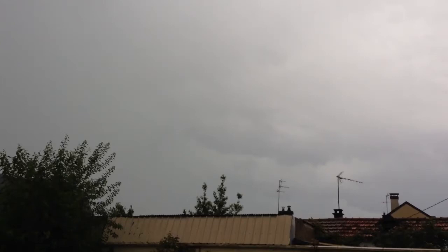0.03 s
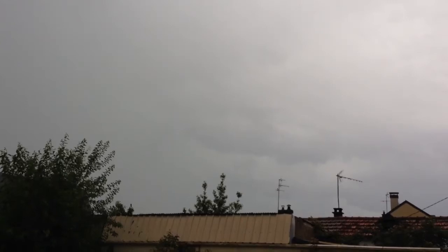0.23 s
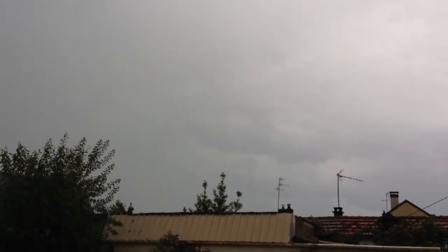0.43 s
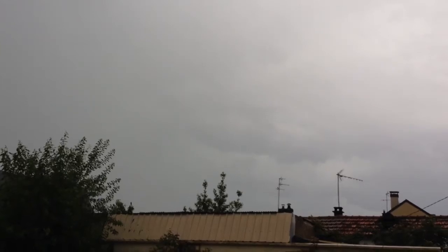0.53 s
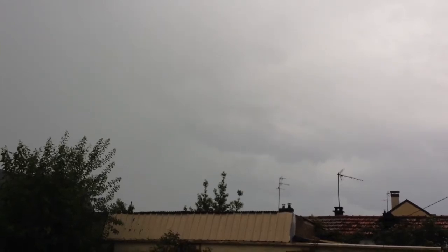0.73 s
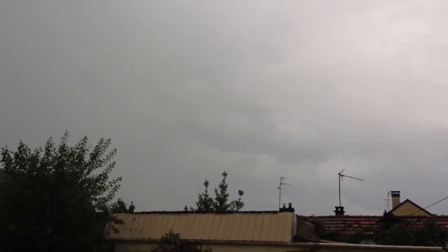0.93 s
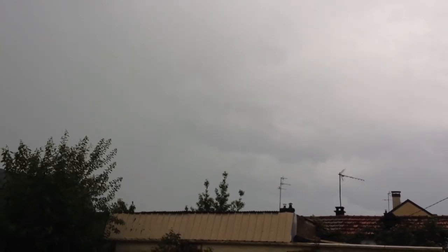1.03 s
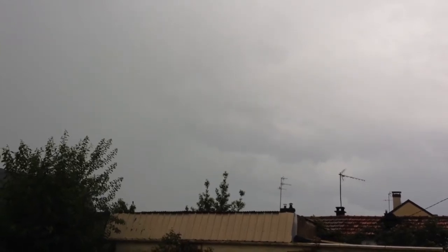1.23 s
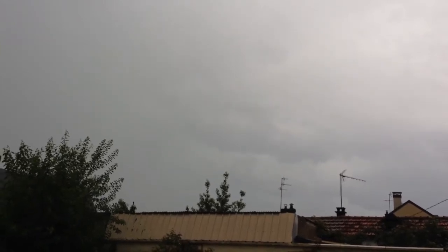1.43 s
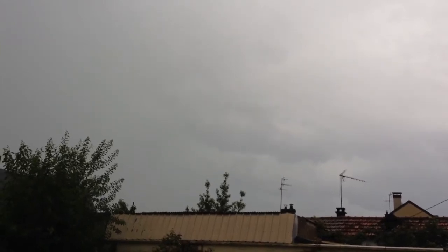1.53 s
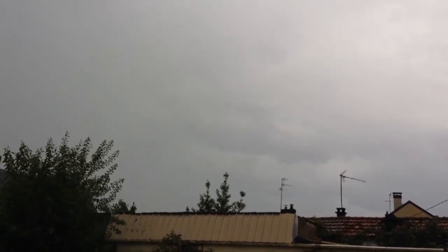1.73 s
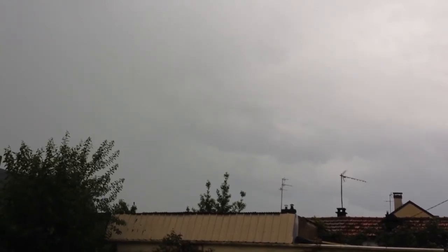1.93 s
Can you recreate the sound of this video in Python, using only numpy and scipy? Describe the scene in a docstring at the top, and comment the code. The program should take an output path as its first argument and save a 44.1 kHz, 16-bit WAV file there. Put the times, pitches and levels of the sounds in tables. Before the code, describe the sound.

Rain hisses and patters evenly over house roofs and leaves, with occasional close drops. A quick cluster of dull, deep bumps hits the microphone near the start, followed by fainter ones, while a low rumble gradually eases.

```python
"""Steady rain over a low rumble

Rain falls on roofs and garden trees: a wash of far drops, a fine patter, small plinks and a few nearer
splashes. Under it a low rumble slowly fades; early on come a few soft, deep thumps, like a handled
microphone, then weaker ones follow. The sound cuts in just after the start."""
import sys
import numpy as np
from scipy import signal
from scipy.fft import rfft, irfft, next_fast_len
from scipy.io import wavfile
from scipy.ndimage import uniform_filter1d, map_coordinates

SR = 44100
rng = np.random.default_rng(int(sys.argv[2]) if len(sys.argv) > 2 else 0)


def dump_mix(stems):
    """Bounce the given channels to the path in sys.argv[1] as a 16-bit WAV at rate SR."""
    frames = np.atleast_2d(stems).T  # one column per channel
    limited = np.clip(frames, -1, 1)  # hard clip at full scale
    pcm = np.round(limited * 32767).astype(np.int16)
    wavfile.write(sys.argv[1], SR, pcm)


N = 88200
START_S, TOP_HZ = .072, 15400


def amp(db):
    """Decibels to gain."""
    return 10 ** (np.asarray(db) / 20)


def unit(x):
    """Scale to rms 1."""
    return x / np.sqrt(np.mean(x ** 2) + 1e-20)


def curve(rows):
    """One value per sample from (s, value) rows."""
    return np.interp(np.arange(N) / SR, *np.transpose(rows))


def wobble(rate):
    """A smooth random curve, rate knots a second."""
    return map_coordinates(rng.standard_normal(int(N * rate / SR) + 4), [np.arange(N) * rate / SR])


def filtered(x, response):
    """x times a response of frequency."""
    m = next_fast_len(len(x) + SR // 4)
    return irfft(rfft(x, m) * response(np.fft.rfftfreq(m, 1 / SR)), m)[:len(x)]


def coloured(x, points):
    """x through a (Hz, dB) spectrum, at rms 1."""
    f, db = np.transpose(points)
    return unit(filtered(x, lambda hz: amp(np.interp(np.log(hz + 1), np.log(f), db))))


def add(track, s, sound):
    """Mix a sound into the track at time s."""
    part = track[max(round(s * SR), 0):][:len(sound)]
    part += sound[:len(part)]


# Spectrum of wash, patter and plinks. Each row: frequency in Hz, relative spectral level in dB.
RAIN_SPECTRUM = [(150, 0), (400, -3), (650, -2), (1000, -5), (1400, -4), (1850, -3), (2800, -8.5),
                 (3600, -6), (4600, -7), (6500, -11), (10000, -14.5), (15000, -18)]
def wash():
    """Incoherent summation: countless far drops merge into a slightly patchy hiss."""
    level_db, patchy_db, flutter_db = -1, .5, .75
    spectrogram = signal.stft(rng.standard_normal(N), nperseg=512)[2]
    patches = uniform_filter1d(rng.standard_normal(spectrogram.shape), size=14, axis=0)  # over frequency
    patches = uniform_filter1d(patches, size=8, axis=1)  # over time
    hiss = signal.istft(spectrogram * amp(patchy_db * unit(patches)), nperseg=512)[1][:N]
    return amp(level_db + flutter_db * wobble(25.79)) * coloured(hiss, RAIN_SPECTRUM)


def patter():
    """Heavily damped impacts: drops on leaves and tiles tick for a cycle or two, most of them weakly."""
    level_db, drops_per_s, spread_db = -6.5, 2500, 2.5
    centre_hz, octaves, decay_cycles = 3750, 1.19, 1.8
    when, size, u, v = rng.random((int(drops_per_s * N / SR), 4)).T[:, :, None]
    hz = np.clip(centre_hz * 2 ** (octaves * np.sqrt(6) * (u - v)), 500, TOP_HZ)
    offsets = np.arange(SR // 200)
    cycles = hz * offsets / SR
    gain = amp(-spread_db * np.log(np.maximum(size, .01))) * hz / centre_hz
    ticks = gain * np.sin(2 * np.pi * cycles) * np.exp(-2 * cycles / decay_cycles)
    positions = (when * N).astype(int) + offsets
    drops = np.bincount(positions.ravel(), ticks.ravel(), N)[:N]
    flurries_db = wobble(35.15)
    return amp(level_db + flurries_db) * coloured(drops, RAIN_SPECTRUM)


def impact_envelope(t, db, t60_s, attack_s=.0018):
    """Exponential decay: after a quick rise, an impact loses 60 dB every t60_s."""
    return amp(db - 60 * t / t60_s) * (1 - np.exp(-t / attack_s))


def plinks():
    """Damped resonance: drops on something hard or wet ring briefly, each at its own pitch."""
    level_db, drops_per_s, spread_db = -11.5, 130, 1.5
    centre_hz, octaves, t60_s = 2200, .85, .042
    out, t = np.zeros(N), np.arange(SR // 12) / SR
    for when, size, u, v in rng.random((int(drops_per_s * N / SR), 4)):
        hz = min(centre_hz * 2 ** (octaves * np.sqrt(6) * (u - v)), TOP_HZ)
        db = -spread_db * np.log(max(size, .05))
        add(out, when * N / SR, impact_envelope(t, db, t60_s) * np.sin(2 * np.pi * hz * t))
    return amp(level_db) * coloured(out, RAIN_SPECTRUM)


# Strength of the rain. Each row: time in seconds, level in dB.
RAIN_LEVEL = [(.07, -59), (.45, -59.5), (.8, -60), (1.2, -59), (1.55, -59.5), (2, -60)]
def rain():
    """Superposition: wash, patter and plinks add up under one nearly steady level."""
    return amp(curve(RAIN_LEVEL)) * (wash() + patter() + plinks())


# Near drops. Each row: start in seconds, level in dB, centre frequency in Hz, width in octaves,
# time to decay by 60 dB in seconds.
SPLASHES = [(.158, -53, 4550, 0.16, .04), (.157, -57.5, 8850, .2, .035), (0.4808, -44, 2310, .5, 0.017),
            (.516, -53, 4300, .25, .02), (.594, -54, 1900, 0.32, .029), (.635, -60, 626, 0.15, 0.21),
            (.704, -56, 5140, .3, .045), (.939, -51.5, 2250, 0.87, 0.058), (1.012, -59.5, 2680, 0.46, .06),
            (1.035, -56.5, 2500, 0.31, .05), (1.048, -61, 5340, 0.12, .06),
            (1.134, -50.5, 4200, 0.22, 0.032), (1.219, -51, 3500, 0.55, 0.02),
            (1.234, -51, 1790, .3, 0.028), (1.237, -58, 11000, .6, .02), (1.283, -53, 1900, .9, .031),
            (1.293, -62, 4400, .15, .06), (1.373, -54.5, 1900, 0.67, .04), (1.441, -60.5, 9800, .3, 0.093),
            (1.682, -64.5, 8000, .6, 0.097), (1.719, -58, 8000, 0.56, 0.06), (1.918, -55, 3000, 0.35, .03),
            (1.971, -53, 4470, .3, 0.031)]
def splashes():
    """Source and filter: near drops burst into a noisy spray, coloured by what they land on."""
    out, t = np.zeros(N), np.arange(SR // 8) / SR
    for start, db, centre, octaves, t60_s in SPLASHES:
        noise = rng.standard_normal(len(t))
        spray = filtered(noise, lambda hz: np.exp(-.5 * (np.log2((hz + 1) / centre) / octaves) ** 2))
        add(out, start, impact_envelope(t, db, t60_s) * unit(spray))
    return out


# Soft, deep thumps. Each row: time of the crest in seconds, peak level in dB, pitch in Hz.
THUMPS = [(.209, -41.5, 76), (.258, -32, 87), (.283, -32.5, 87.7), (.309, -25.5, 79.8), (.349, -28.8, 90),
          (.393, -40.5, 75.6), (0.469, -44, 99), (0.504, -39, 66.6), (.551, -40.5, 82), (.603, -42.5, 96),
          (.687, -38, 75), (.854, -39.5, 82), (0.959, -40, 75.6), (1.056, -42.5, 80), (1.086, -44.5, 67),
          (1.159, -42, 91), (1.286, -44.5, 77), (1.367, -45.5, 105), (1.435, -45.5, 111.5),
          (1.525, -47.5, 90), (1.66, -43.5, 90), (1.708, -40.5, 92)]
def thumps():
    """Gaussian tone pulses: deep thumps swell and die within a few cycles, each with a faint octave."""
    width_s, octave_db = .013, -19
    out, t = np.zeros(N), np.arange(N) / SR
    for crest, db, hz in THUMPS:
        phase = 2 * np.pi * (hz * (t - crest) + rng.random())
        envelope = amp(db) * np.exp(-((t - crest) / width_s) ** 2)
        out += envelope * (np.sin(phase) + amp(octave_db) * np.sin(2 * phase))
    return out


# Spectrum of the rumble. Each row: frequency in Hz, relative spectral level in dB.
RUMBLE_SPECTRUM = [(10, -36), (22, -18), (40, -7.5), (66, 3), (95, -2), (120, -1), (143, -8), (170, -4),
                   (225, -10.5), (320, -18), (400, -25), (600, -34.5), (1200, -84)]
# Strength of the rumble. Each row: time in seconds, level in dB.
RUMBLE_LEVEL = [(.07, -45.5), (.17, -50), (.4, -45.5), (.58, -47.5), (.75, -49.5), (.87, -50.5), (1, -51.5),
                (1.1, -50.5), (1.3, -50), (1.42, -50.5), (1.56, -57.5), (1.62, -51), (1.8, -51), (2, -53)]
def rumble():
    """Low-frequency noise with a compressed envelope: an even roll that slowly fades."""
    evenness = .48  # share of the chance swings in level that is smoothed away
    roll = coloured(rng.standard_normal(N), RUMBLE_SPECTRUM)
    running_rms = np.sqrt(abs(uniform_filter1d(roll ** 2, size=2600)) + 1e-6)
    return amp(curve(RUMBLE_LEVEL)) * unit(roll / running_rms ** evenness)


def scene():
    """Superposition: the pressures of rumble, thumps and rain add in one channel."""
    return (rumble() + thumps() + splashes() + rain())[None]


def record(dry):
    """Gating and band limiting: the microphone opens at START_S and keeps nothing above TOP_HZ."""
    gate = np.arange(N) / SR >= START_S
    return filtered(dry[0] * gate, lambda hz: hz < TOP_HZ)[None]


dry = scene()
out = record(dry)
dump_mix(out)
```